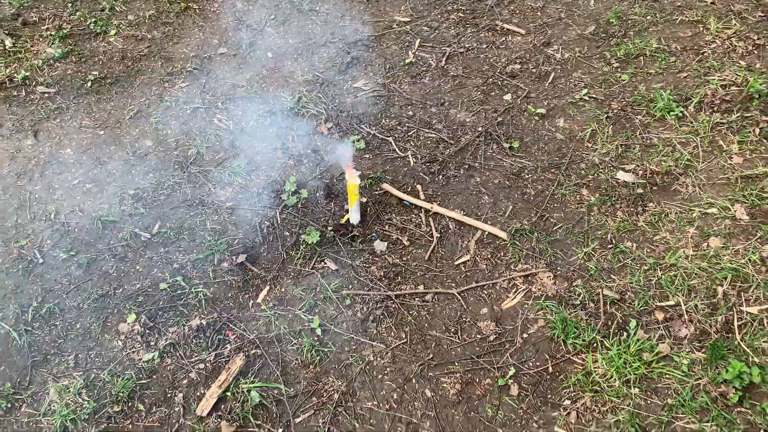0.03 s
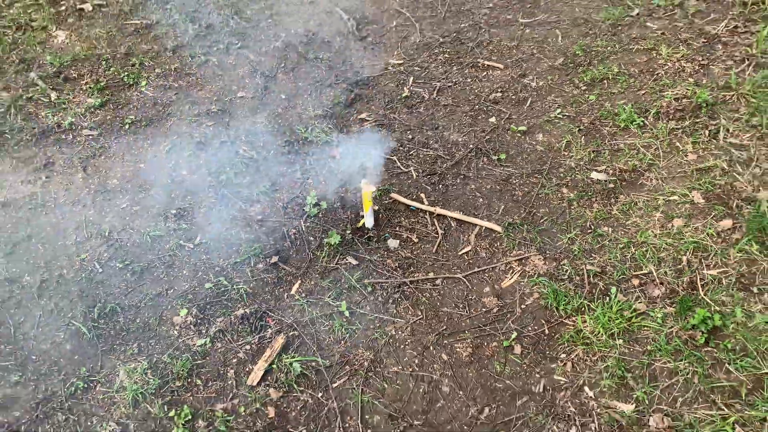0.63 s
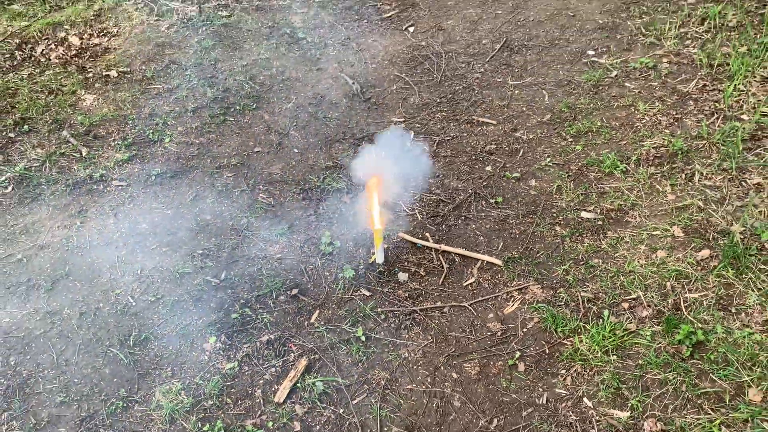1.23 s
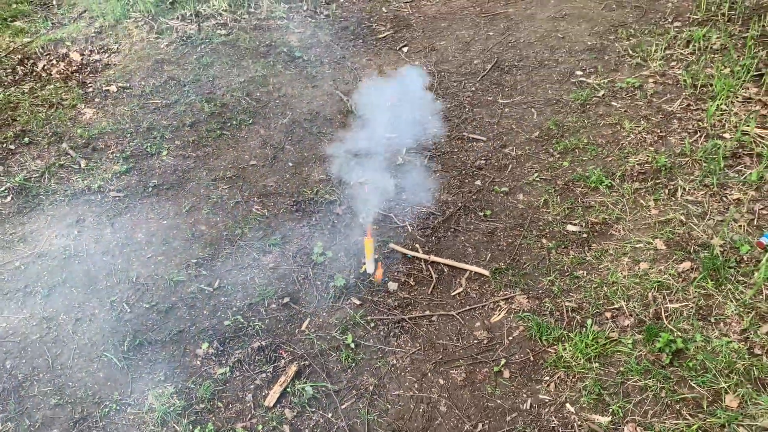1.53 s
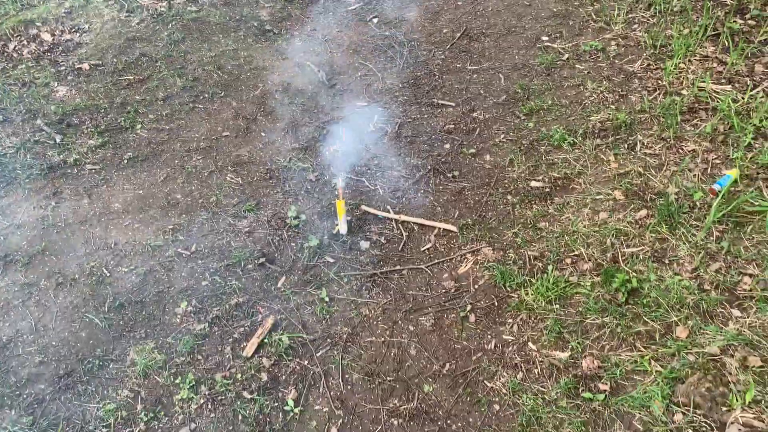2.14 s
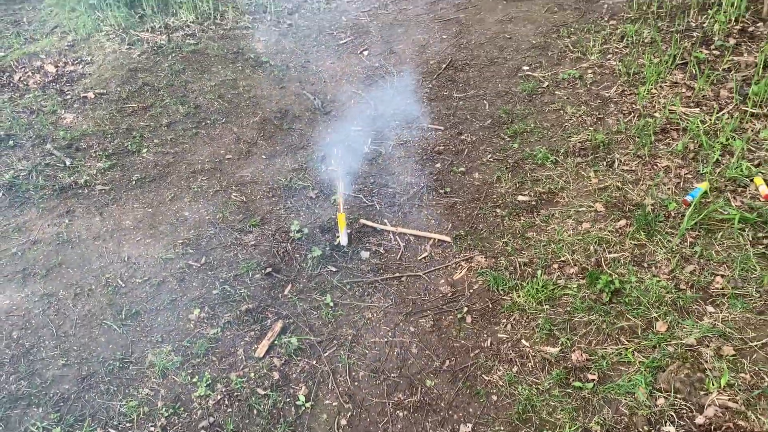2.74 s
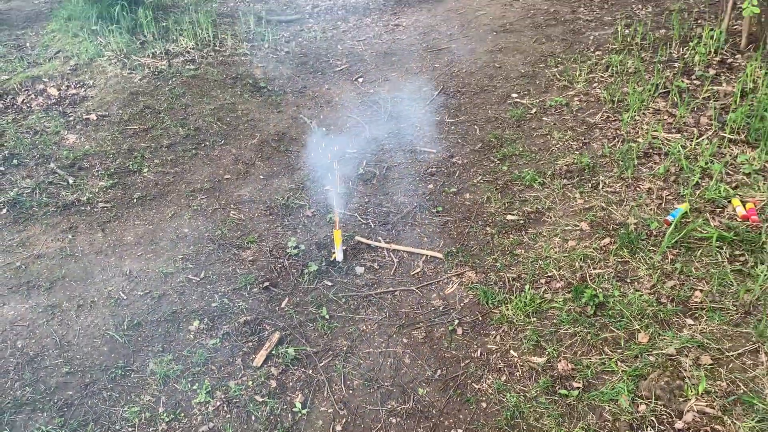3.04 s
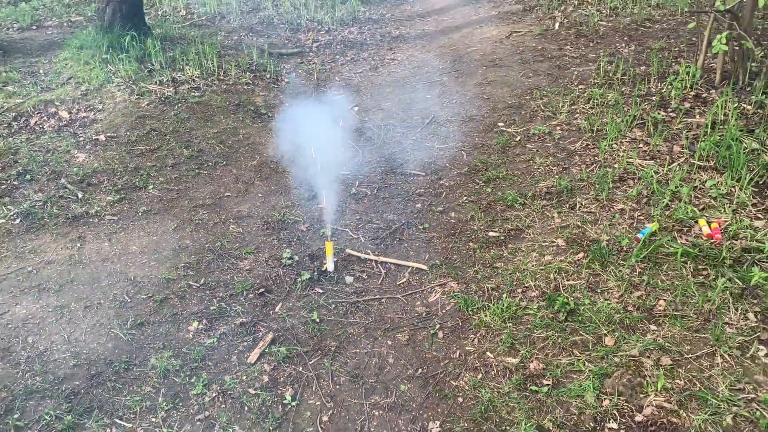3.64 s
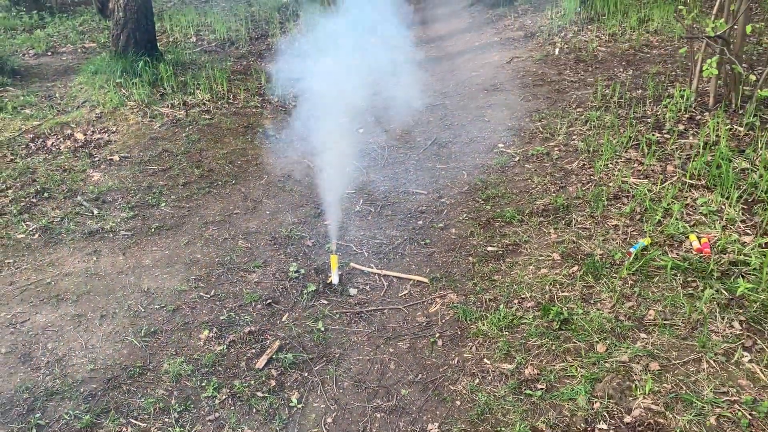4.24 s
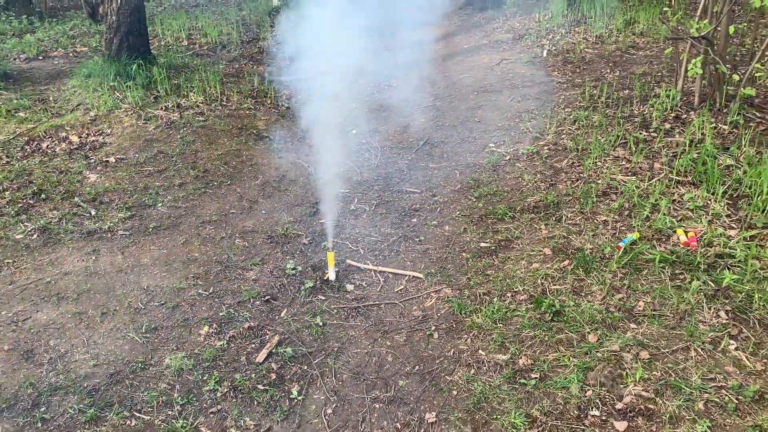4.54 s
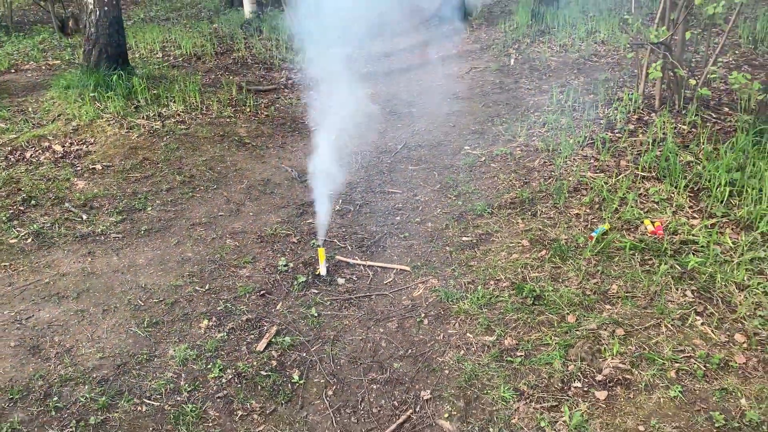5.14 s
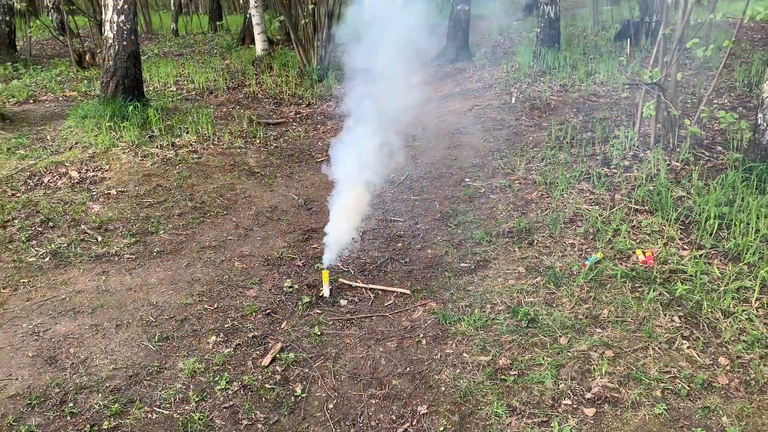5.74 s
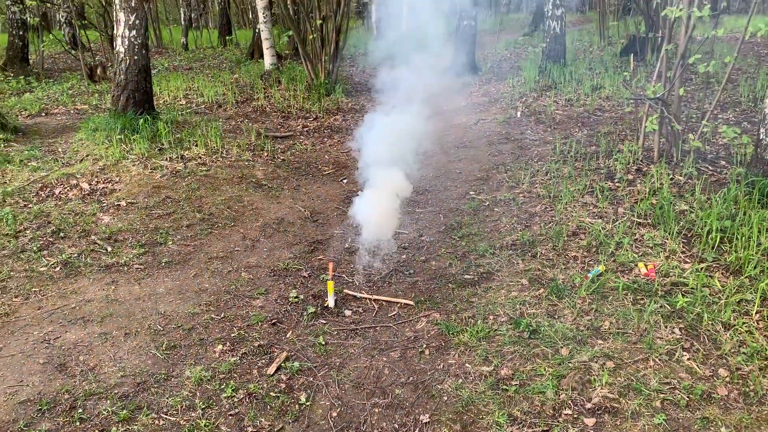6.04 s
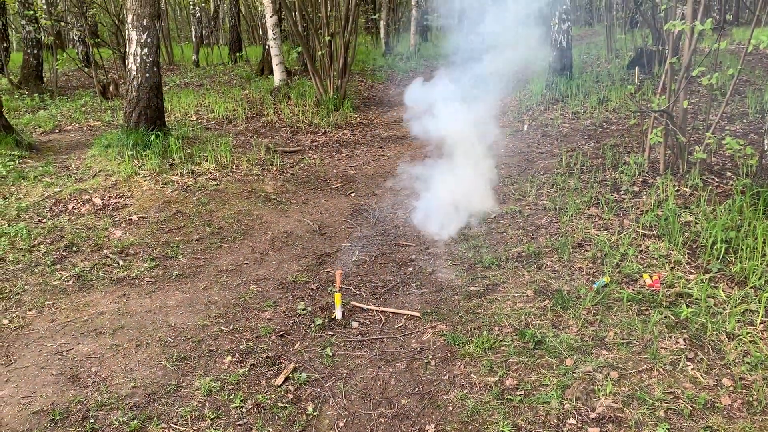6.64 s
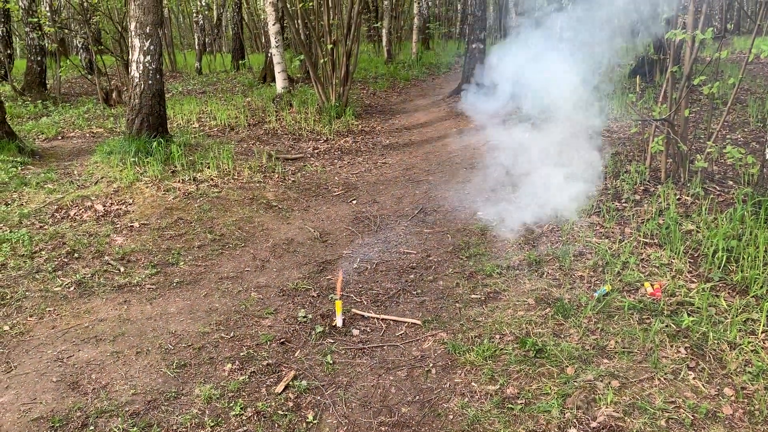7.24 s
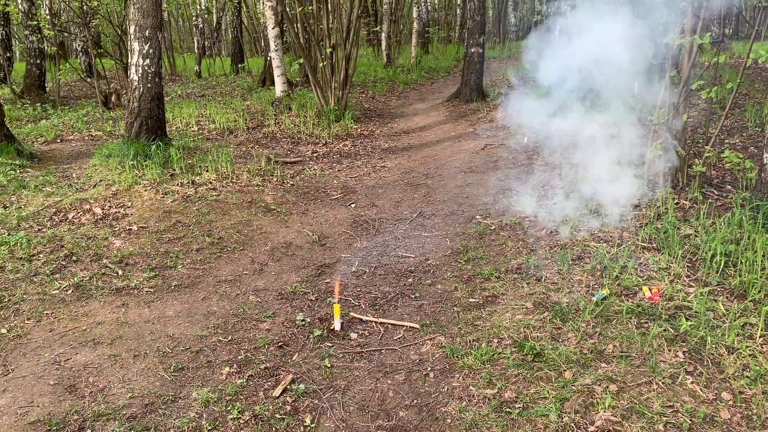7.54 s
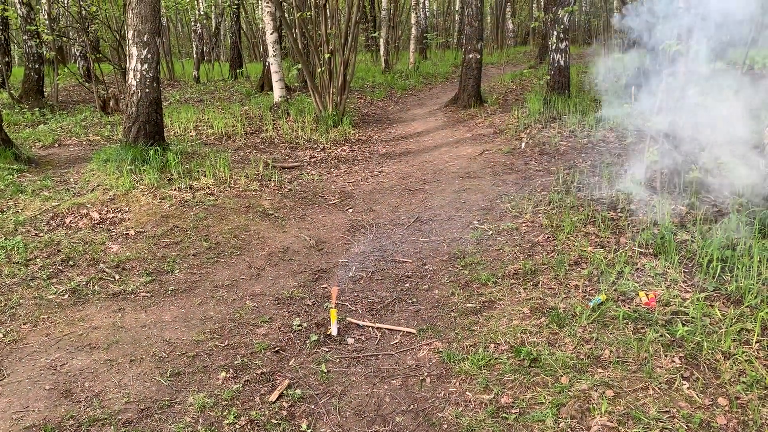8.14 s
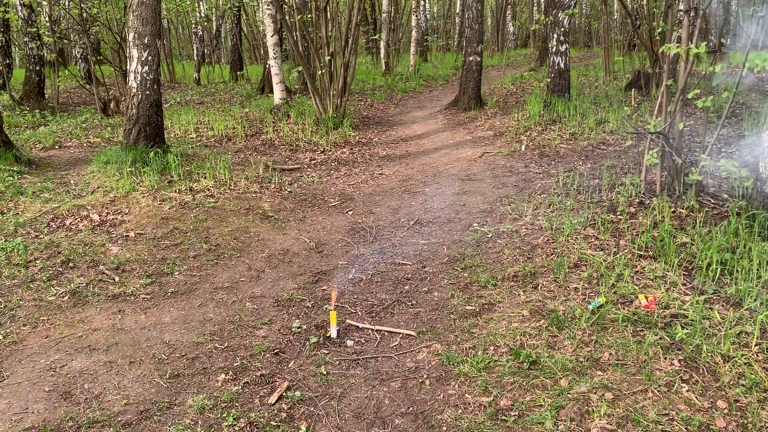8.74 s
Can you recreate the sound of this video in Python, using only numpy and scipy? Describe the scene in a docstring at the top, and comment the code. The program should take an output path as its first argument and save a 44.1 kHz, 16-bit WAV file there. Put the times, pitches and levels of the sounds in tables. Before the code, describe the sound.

A smoke tube hisses, swells to a sputtering, popping roar, then dies down to a small fluttering flame with faint crackles.

```python
"""A smoke tube burns on a forest path, close to a pair of microphones. Its jet of gas hisses, licks once
with flame, swells to a sputtering, popping roar and dies away. With a soft pop the gas catches fire at
the mouth and burns on as a small fluttering flame with faint crackles. Echoes off the ground carve
sliding notches into jet and flame. A low outdoor rumble lies underneath, and a faint whistle sounds
once, far off among the trees."""
import sys
import numpy as np
from scipy import signal
from scipy.fft import rfft, irfft, next_fast_len
from scipy.io import wavfile

SR = 44100
rng = np.random.default_rng(int(sys.argv[2]) if len(sys.argv) > 2 else 0)


def transcribe(u):
    """Save the signal u as a 16-bit wav file named by the first command-line argument.

    u: samples, shape (n,) or (channels, n), limited to [-1, 1]; the rate is SR.
    q: integer samples, one column per channel.
    """
    v = np.clip(np.atleast_2d(u).T, -1, 1)
    q = np.round(v * 32767).astype(np.int16)
    wavfile.write(sys.argv[1], SR, q)


N = 396459
TIME = np.arange(N) / SR
FFT_SIZE = next_fast_len(N, True)
BIN_HZ = np.maximum(np.fft.rfftfreq(FFT_SIZE, 1 / SR), 1)
IGNITION_S = 5.85

# Tone colours of the plume, the gas in the tube and the flame. Each row: frequency in Hz, relative dB.
ROAR_SPECTRUM = [(60, -19.5), (130, -3), (210, -0.5), (290, -1.5), (365, -9.5), (440, -1), (620, -3.5),
                 (725, -1.5), (860, -5), (1040, -10.5), (1300, -3), (1700, -9), (3500, -49)]
RUSH_SPECTRUM = [(500, -27), (1000, -7.5), (1600, 0), (2300, -0.5), (3200, 0), (4000, 0.5), (5200, -3),
                 (6400, -8), (7500, -1.5), (10000, -47)]
FLAME_SPECTRUM = [(60, 3.5), (120, 11.5), (220, 14), (350, 4), (470, 8), (620, 5.5), (800, 5), (1250, -1.5),
                  (1800, 4), (2500, 2.5), (3300, 0.5), (4450, -7.5), (5100, -4), (5650, -21.5),
                  (6100, -18.5), (7000, -21), (10000, -66)]


def from_db(db):
    """Decibels to gain."""
    return 10 ** (np.asarray(db) / 20)


def unit_rms(x):
    """Scale to an rms of one."""
    return x / np.sqrt(np.mean(x ** 2) + 1e-20)


def in_time(rows):
    """One curve over time for each column after the first, which holds the seconds."""
    seconds, *columns = np.transpose(rows)
    return [np.interp(TIME, seconds, column) for column in columns]


def across_hz(rows):
    """Join rows of frequency and value by straight lines over log frequency."""
    hz, value = np.transpose(rows)
    return np.interp(np.log(BIN_HZ), np.log(hz), value)


def ramp(start_s, length_s):
    """A straight rise from 0 to 1."""
    return np.clip((TIME - start_s) / length_s, 0, 1)


def drift(rate_hz):
    """A smooth random wander of unit rms, changing at about rate_hz."""
    hop = 20
    pole = np.exp(-2 * np.pi * rate_hz * hop / SR)
    slow = signal.lfilter([1], [1, -2 * pole, pole * pole], rng.standard_normal(N // hop + 2))
    return np.interp(np.arange(N) / hop, np.arange(len(slow)), unit_rms(slow))


def filtered(x, response):
    """Apply a gain to every frequency."""
    return irfft(rfft(x, FFT_SIZE) * response, FFT_SIZE)[..., :N]


def low_part(x, edge_hz, order):
    """What lies below the edge frequency."""
    return filtered(x, 1 / (1 + (BIN_HZ / edge_hz) ** order))


def coloured(x, spectrum):
    """Shape a signal by a spectrum, at unit rms."""
    return unit_rms(filtered(x, from_db(across_hz(spectrum))))


def turbulence(spectrum):
    """Two unrelated noises of one colour: the direct sound and its scattered part."""
    return coloured(rng.standard_normal((2, N)), spectrum)


def clicks(per_s, spread_db):
    """Sparse clicks of random size, direct and scattered; spread_db makes them more uneven."""
    born = rng.random(N) < per_s / SR
    size = from_db(spread_db * np.minimum(rng.exponential(1, N), 3))
    return born * size * rng.standard_normal((2, N))


def resonant_noise(centre_hz, width_hz):
    """A band of noise around a resonance."""
    slow = low_part(rng.standard_normal((2, 2, N)), width_hz / 2, order=2)
    phase = 2 * np.pi * centre_hz * TIME
    return unit_rms(slow[0] * np.cos(phase) + slow[1] * np.sin(phase))


def ground_echoes(x, strength):
    """Moving echoes carve sliding notches, deepest in the direct sound; a long source blurs the top ones."""
    # The echo comes later when the burning gas stands higher. Each row: time in seconds, lag in ms,
    # blur in ms.
    ground_lag = [(0.2, 0.55, 0.011), (0.55, 0.52, 0.0044), (1.02, 0.47, 0.0055), (1.12, 0.54, 0.01),
                  (1.22, 0.57, 0.012), (1.33, 0.575, 0.028), (1.45, 0.55, 0.013), (1.6, 0.48, 0.004),
                  (1.8, 0.46, 0.006), (2.1, 0.47, 0.012), (2.5, 0.422, 0.016), (3.0, 0.41, 0.011),
                  (4.0, 0.36, 0.022), (4.6, 0.37, 0.029), (5.75, 0.33, 0.013)]
    # The ground and things lying near. Each row: delay in ground lags, relative gain.
    reflections = [(1, 0.67), (3.15, 0.03), (6.3, 0.053), (11.3, 0.11)]
    lag_ms, blur_ms = in_time(ground_lag)
    lag_ms = lag_ms * (1 + 0.006 * drift(4.2))
    blur_ms = blur_ms * drift(290)
    oversample = 4
    fine = signal.resample_poly(x, oversample, 1, axis=1)
    heard, power = x, 1
    for multiple, share in reflections:
        emitted_s = np.clip(TIME - (multiple * lag_ms + blur_ms) / 1000, 0, TIME[-1])
        gain = strength * share * np.array([[1], [0.58]])   # direct, scattered
        heard = heard + gain * fine.take(np.rint(emitted_s * SR * oversample).astype(int), axis=1)
        power = power + gain ** 2
    return heard / np.sqrt(power)


def outdoor_rumble(level_db):
    """The steady low background of the forest path."""
    # Each row: frequency in Hz, relative level in dB.
    spectrum = [(20, -51), (35, -27.5), (48, -5), (59, 1), (76, -2.5), (110, -5), (170, -8.5), (260, -15.5),
                (450, -22), (900, -26), (2000, -41.5), (5000, -56.5), (16000, -61.5)]
    return from_db(level_db) * turbulence(spectrum)


def jet(roar_db, rush_db, hiss_db, top_db, mouth_db):
    """Gas rushes through the tube and out of the nozzle; the uneven burn shakes the plume's roar most."""
    # Each row: time in seconds, then relative dB of the tube's rush, the nozzle's hiss and its top treble.
    jet_levels = [(0.13, -50.5, -52.5, -50), (0.27, -51, -47.5, -50), (0.58, -52.5, -48.5, -61),
                  (1.0, -49.5, -50, -55), (1.09, -52, -45.5, -57), (1.54, -57.5, -51, -57),
                  (1.73, -54, -47, -57), (2.14, -51, -40, -47), (2.85, -47, -35.5, -51.5),
                  (2.88, -42.5, -35, -53), (3.03, -48.5, -40.5, -54), (3.18, -45, -45.5, -59),
                  (3.28, -41, -44, -53.5), (3.76, -38, -36.5, -46), (4.76, -34, -30, -37.5),
                  (4.82, -39, -34.5, -41.5), (4.99, -36.5, -34, -40.5), (5.6, -55, -60.5, -73),
                  (5.78, -56.5, -71, -95)]
    # The roar of the plume. Each row: time in seconds, relative level in dB.
    plume_levels = [(0.14, -62), (0.85, -60.5), (1.5, -56.5), (1.9, -52.5), (2.5, -53.5), (3.95, -46.5),
                    (4.48, -38), (4.72, -35), (4.8, -41.5), (5.05, -42), (5.2, -47), (5.6, -66)]
    # The hiss at the nozzle. Each row: frequency in Hz, relative level in dB.
    hiss_spectrum = [(5000, -47), (6600, -4), (7400, -2.5), (8400, 1.5), (9100, 0.5), (9700, 0), (10800, 0),
                     (12300, -4), (14000, -7.5), (15700, -5.5)]
    rush, hiss, top = in_time(jet_levels)
    roar, = in_time(plume_levels)
    burn = drift(34)
    sputter_db, flicker_db, fizzle_db = 2.5, 1.03, 0.97   # rms swings of plume, tube and nozzle
    plume = turbulence(ROAR_SPECTRUM)
    spits = coloured(clicks(per_s=200, spread_db=0), ROAR_SPECTRUM)
    plume = unit_rms(plume + 0.36 * spits) * from_db(roar + roar_db + sputter_db * burn)
    tube = turbulence(RUSH_SPECTRUM) * from_db(rush + rush_db + flicker_db * burn)
    mouth = resonant_noise(centre_hz=8246, width_hz=1160) * from_db(mouth_db + (rush + hiss) / 2)
    nozzle = turbulence(hiss_spectrum)
    lower = low_part(nozzle, edge_hz=12570, order=16)
    nozzle = lower * from_db(hiss + hiss_db) + (nozzle - lower) * from_db(top + top_db)
    nozzle *= from_db(fizzle_db * (burn + drift(60)) / np.sqrt(2))
    gas = ground_echoes(plume + tube + mouth, strength=0.94) + ground_echoes(nozzle, strength=0.54)
    return gas * (1 - ramp(IGNITION_S - 0.072, 0.4))   # the jet ends as the flame takes over


def gas_pops(thud_db, puff_db, crack_db, puff_s):
    """Each pocket of gas gives a short puff of noise and a round thud that sinks in pitch as it expands."""
    # Each row: start in seconds, thud in relative dB, its swell in seconds, puff in relative dB.
    pockets = [(0.102, -32, 0.0095, -37.5), (1.195, -37.5, 0.005, -46), (1.502, -38, 0.0036, -48),
               (1.684, -42, 0.004, -41), (1.843, -44, 0.005, -57), (2.092, -38, 0.0044, -49),
               (2.517, -37, 0.004, -48), (4.189, -31, 0.0078, -40), (4.337, -33, 0.0088, -45.5),
               (4.465, -36, 0.0034, -26.5), (4.5, -26, 0.0051, -45.5), (4.609, -22, 0.005, -40.5),
               (4.656, -34.5, 0.0039, -46), (4.7, -28.5, 0.003, -31.5), (4.713, -27, 0.004, -26.5),
               (4.884, -38, 0.004, -45), (4.955, -36, 0.0054, -42), (4.987, -28, 0.0047, -48),
               (5.027, -33, 0.005, -36), (5.066, -28, 0.0065, -34), (5.101, -27.5, 0.0053, -42),
               (5.152, -33, 0.0044, -36), (5.173, -27.5, 0.0068, -40.5), (5.229, -32, 0.003, -44),
               (5.247, -28, 0.0058, -41), (5.273, -32, 0.0033, -53), (5.313, -33, 0.0054, -56),
               (5.338, -29.5, 0.0066, -49), (5.379, -31.5, 0.0047, -46.5), (5.796, -26.5, 0.0075, -40),
               (5.85, -42, 0.0068, -44), (6.043, -35, 0.0041, -45)]
    start_hz, end_hz, glide_s = 512, 140.4, 0.0039
    age = TIME[:SR // 10]
    hz = end_hz + (start_hz - end_hz) * np.exp(-age / glide_s)
    sinking = np.sin(2 * np.pi * np.cumsum(hz) / SR)
    kicks, thuds = np.zeros((2, N))
    for start_s, pocket_db, swell_s, kick_db in pockets:
        onset = round(start_s * SR)
        kicks[onset] += from_db(kick_db)
        swell = age / swell_s * np.exp(0.5 - 0.5 * (age / swell_s) ** 2)
        thuds[onset:onset + len(age)] += from_db(pocket_db + thud_db) * sinking * swell
    puff_envelope = signal.lfilter([1], [1, -np.exp(-1 / (puff_s * SR))], kicks + 1e-18)
    puff = from_db(puff_db) * turbulence(ROAR_SPECTRUM) + from_db(crack_db) * turbulence(RUSH_SPECTRUM)
    return thuds * [[1], [0]] + puff_envelope * puff   # the thuds arrive direct only


def flame_lick(start_s, length_s, fade_s, gain_db):
    """A flame licks briefly from the mouth with a low, fluttering rustle."""
    rustle = low_part(turbulence(FLAME_SPECTRUM), edge_hz=520, order=3)
    envelope = ramp(start_s, fade_s) - ramp(start_s + length_s, fade_s)
    flutter_db = 1.5 * drift(25)
    return ground_echoes(rustle * envelope * from_db(gain_db + flutter_db), strength=0.79)


def flare_level(attack_s, release_s):
    """The flame's level in dB: each flare swells, holds and dies back to the steady flame."""
    # The steady flame between flares. Each row: time in seconds, relative level in dB.
    steady_levels = [(5.9, -75), (6.3, -56.5), (6.63, -73), (6.78, -62), (7.1, -66.5), (7.31, -64),
                     (7.5, -58), (7.72, -55), (7.93, -58), (7.99, -61), (8.2, -57.5), (8.3, -65.5),
                     (8.65, -82), (8.85, -71)]
    # Each row: start in seconds, length in seconds, relative level in dB.
    flares = [(5.832, 0.15, -48.5), (5.97, 0.093, -50), (6.06, 0.068, -53.5), (6.143, 0.175, -56.5),
              (6.339, 0.038, -50.5), (6.421, 0.046, -56.5), (6.483, 0.04, -56), (6.552, 0.031, -55),
              (6.65, 0.12, -56), (6.79, 0.033, -50.5), (6.831, 0.022, -54.5), (6.904, 0.044, -53),
              (6.995, 0.063, -53.5), (7.129, 0.099, -52), (7.244, 0.047, -54.5), (7.325, 0.082, -51),
              (7.413, 0.067, -52.5), (7.517, 0.1, -53), (7.596, 0.085, -48), (7.732, 0.03, -50.5),
              (7.791, 0.15, -49.5), (8.057, 0.06, -51), (8.144, 0.11, -52.5), (8.318, 0.034, -58.5),
              (8.374, 0.137, -54), (8.533, 0.029, -57.5), (8.583, 0.018, -58), (8.692, 0.1, -67),
              (8.782, 0.04, -52.5)]
    gain = from_db(in_time(steady_levels)[0])
    for start_s, length_s, flare_db in flares:
        span = slice(round(start_s * SR), round((start_s + length_s + 0.2) * SR))
        age = TIME[span] - start_s
        envelope = np.clip(age / attack_s, 0, 1) * np.exp(-np.maximum(age - length_s, 0) / release_s)
        gain[span] = np.maximum(gain[span], from_db(flare_db) * envelope)
    return 20 * np.log10(gain)


def flame(body_db, simmer_db, crackle_db):
    """Gas burns at the mouth; its low rustle follows the flares a little, its fizz strongly, in spurts."""
    # The topmost fizz in a middling flare. Each row: time in seconds, relative level in dB.
    fizz_levels = [(5.9, -71.5), (6.2, -71.5), (7.0, -69), (7.7, -64.5), (8.2, -69), (8.8, -66.5)]
    # The colour of that fizz. Each row: frequency in Hz, relative level in dB.
    fizz_spectrum = [(4000, -10), (6600, 2.5), (7500, -7), (8450, 8), (9600, 2), (11200, 7), (13000, -8),
                     (15500, -10)]
    flutter_db, rasp_db = 1.5 * drift(43), 1.5 * drift(260)
    level_db = flare_level(attack_s=0.017, release_s=0.015) + flutter_db + rasp_db
    middling_db = -51.5
    swing_db = level_db - middling_db
    whoosh_db = 4.5 * np.exp(-np.maximum(TIME - IGNITION_S, 0) / 0.14)   # gathered gas burns off
    body = turbulence(FLAME_SPECTRUM)
    low = low_part(body, edge_hz=520, order=3)
    rustle = low * from_db(middling_db + 0.2 * swing_db + whoosh_db)
    hiss = (body - low) * from_db(level_db)
    fizz = turbulence(fizz_spectrum)
    spurt_db = 3 * drift(35)
    fizz_db = in_time(fizz_levels)[0] + 1.3 * swing_db + spurt_db
    fizz *= np.hypot(from_db(fizz_db), from_db(simmer_db))
    crackle_band = signal.butter(2, [2500, 12000], "band", fs=SR, output="sos")
    ticks = signal.sosfilt(crackle_band, clicks(per_s=20, spread_db=3) + 1e-18)
    fire = from_db(body_db) * (rustle + hiss) + fizz + from_db(crackle_db) * unit_rms(ticks)
    return ground_echoes(fire * ramp(IGNITION_S, 0.003), strength=0.79)


def far_whistle(start_s, length_s, gain_db, forest_t60_s):
    """A thin, wavering tone far off, fading as it sounds and smeared by echoes from the trunks."""
    # The pitch lifts and sinks. Each row: time in seconds, pitch in Hz.
    pitch = [(6.14, 1478), (6.2, 1500), (6.25, 1574), (6.31, 1513), (6.35, 1442), (6.45, 1517), (6.6, 1478)]
    fade_s, loss_db_per_s, waver, direct_db = 0.053, 14, 0.0342, -6
    hz = in_time(pitch)[0] * (1 + waver * drift(78))
    envelope = ramp(start_s, fade_s) - ramp(start_s + length_s - fade_s, fade_s)
    envelope *= from_db(gain_db - loss_db_per_s * np.maximum(TIME - start_s, 0))
    tone = envelope * np.sin(2 * np.pi * np.cumsum(hz) / SR)
    trunks = rng.standard_normal((2, SR)) * from_db(-60 * TIME[:SR] / forest_t60_s)
    echoes = signal.fftconvolve(tone[None], unit_rms(trunks) / np.sqrt(SR), axes=1)[:, :N]
    return from_db(direct_db) * tone + echoes


def microphones(x):
    """Direct and scattered sound reach the left and right microphones, phase and level set by pitch."""
    # Each row: frequency in Hz, lead of the left microphone in radians.
    phase_lead = [(50, 0), (1500, 0.41), (2400, 0.79), (2750, 1.5), (3050, 3), (3400, 4), (3800, 1.35),
                  (5400, 1.6), (6000, 0), (6500, 0.72), (7400, 4), (8550, 3), (10000, 1.24), (10800, 1.16),
                  (11500, -7), (12000, -0.2), (13400, -5), (15000, -5), (15500, -5)]
    # Each row: frequency in Hz, likeness of the two sides from 0 to 1.
    likeness = [(50, 0.97), (300, 0.96), (550, 0.68), (1000, 0.29), (1600, 0.93), (2600, 0.59), (3050, 0.8),
                (3400, 0.78), (3800, 0.47), (4700, 0.83), (5500, 0.24), (6300, 0.9), (6900, 0.38),
                (7500, 0.74), (8500, 1), (9700, 1), (11000, 1), (12100, 1), (13400, 0.99), (14500, 0.85),
                (15600, 0.97)]
    # Each row: frequency in Hz, left minus right in dB.
    balance = [(50, -1), (1100, 1), (2500, -2), (3500, -0.5), (5600, -5.5), (7100, 3.5), (7900, -0.5),
               (16000, 0.5)]
    direct, scattered = rfft(x, FFT_SIZE)
    sides = np.array([[1], [-1]])
    alike = np.clip(across_hz(likeness), 0, 1)
    pair = np.sqrt((1 + alike) / 2) * direct + sides * np.sqrt((1 - alike) / 2) * scattered
    pair *= np.exp(0.5j * sides * across_hz(phase_lead))
    pair *= from_db(0.5 * sides * across_hz(balance))
    return irfft(pair, FFT_SIZE)[:, :N]


def scene():
    """The smoke tube close by, the rumble all around and the whistle far off in the trees."""
    tube = jet(roar_db=1, rush_db=4.5, hiss_db=5.5, top_db=15, mouth_db=2)
    tube += gas_pops(thud_db=-2.5, puff_db=-3, crack_db=-9, puff_s=0.012)
    tube += flame_lick(start_s=0.96, length_s=0.43, fade_s=0.059, gain_db=-49)
    tube += flame(body_db=5.5, simmer_db=-78, crackle_db=-95)
    tube *= from_db([[0], [-1.5]])   # the tube is near, so less of it arrives scattered
    rumble = outdoor_rumble(level_db=-47.5)
    whistle = far_whistle(start_s=6.12, length_s=0.51, gain_db=-51.5, forest_t60_s=0.67)
    return microphones(tube + rumble) + whistle


def record(dry):
    """Sound sets in after a moment of silence; the top treble is cut steeply."""
    start_s, cutoff_hz = 0.06, 15800
    treble_cut = 1 / np.sqrt(1 + (BIN_HZ / cutoff_hz) ** 400)
    return filtered(dry * ramp(start_s, 0.00097), treble_cut)


dry = scene()
out = record(dry)
transcribe(out)
```